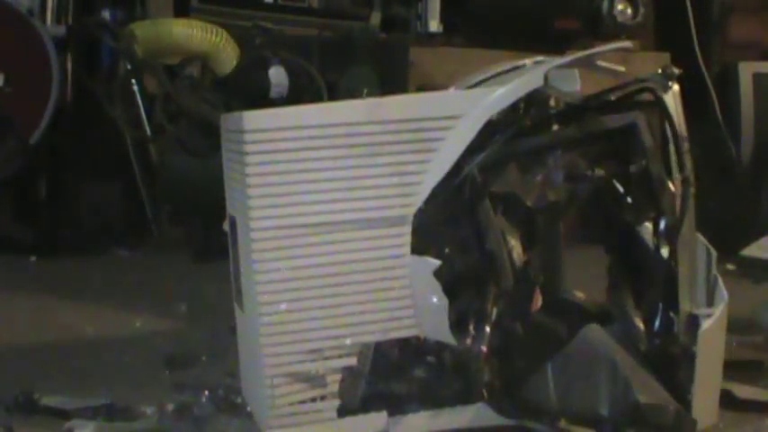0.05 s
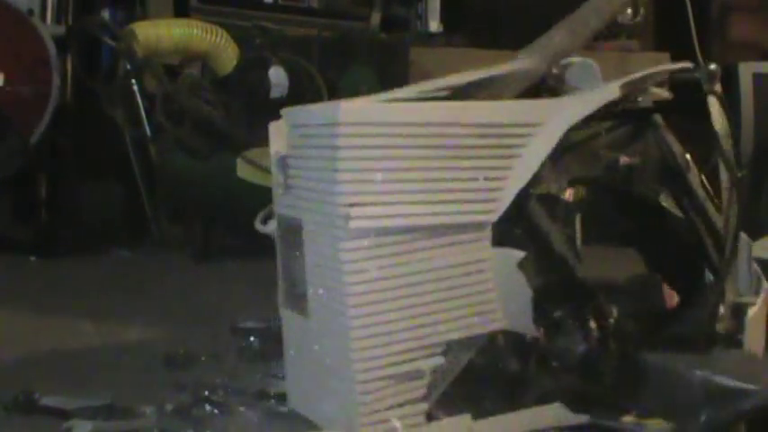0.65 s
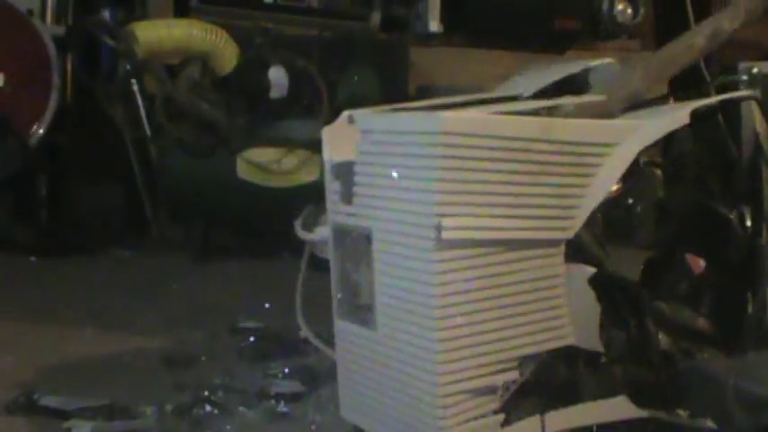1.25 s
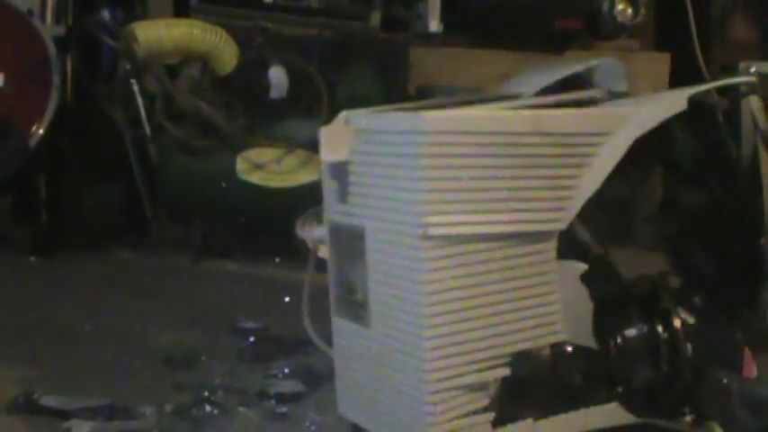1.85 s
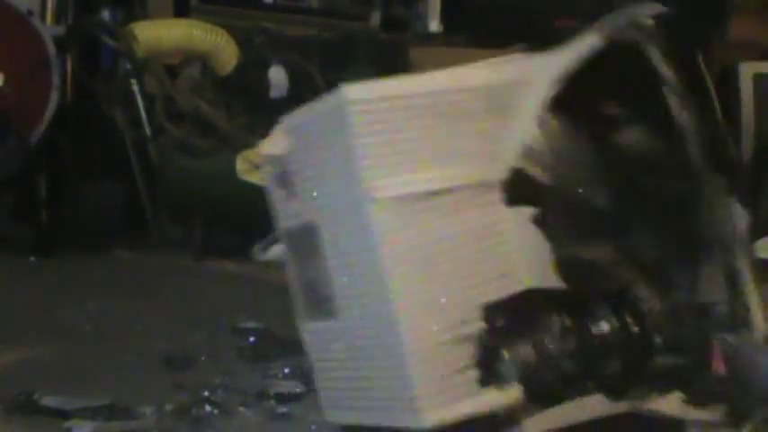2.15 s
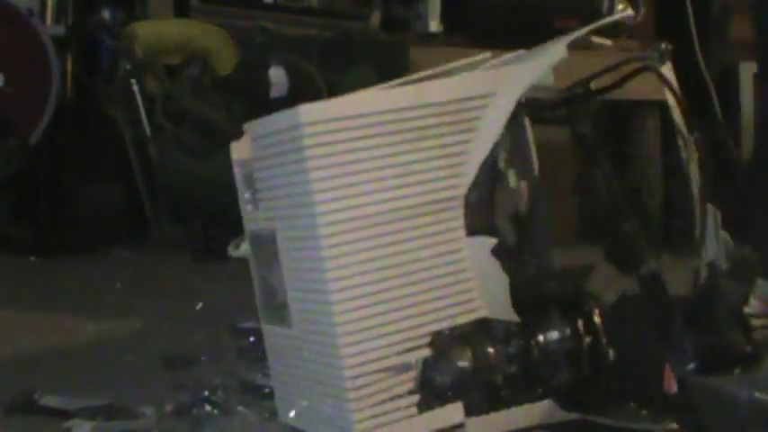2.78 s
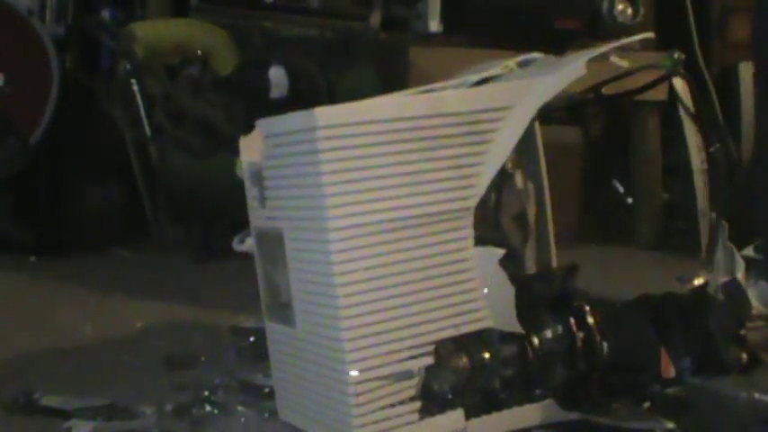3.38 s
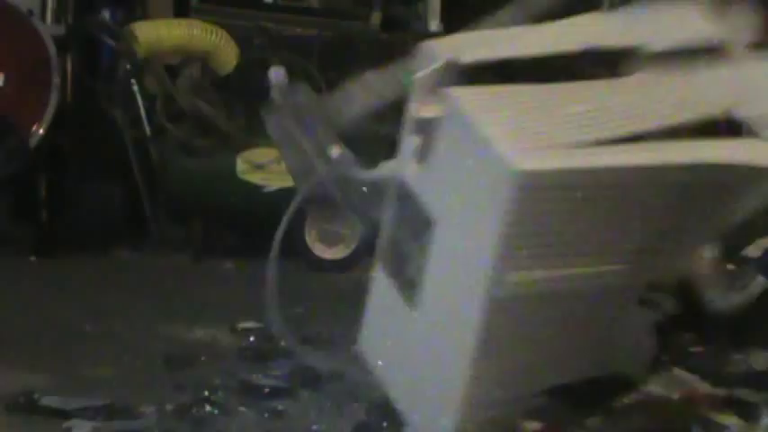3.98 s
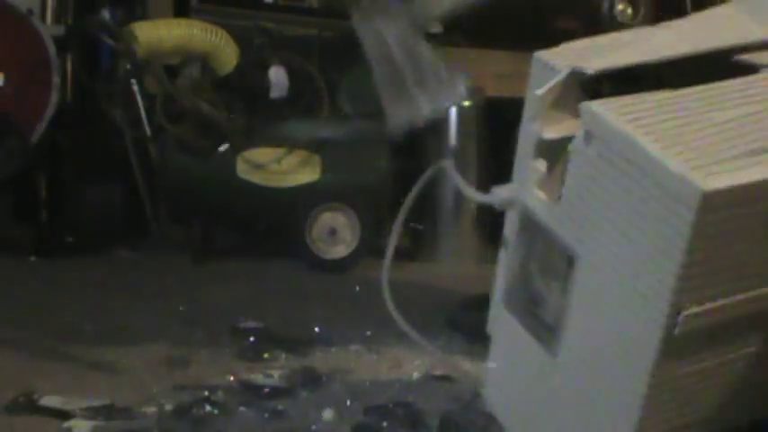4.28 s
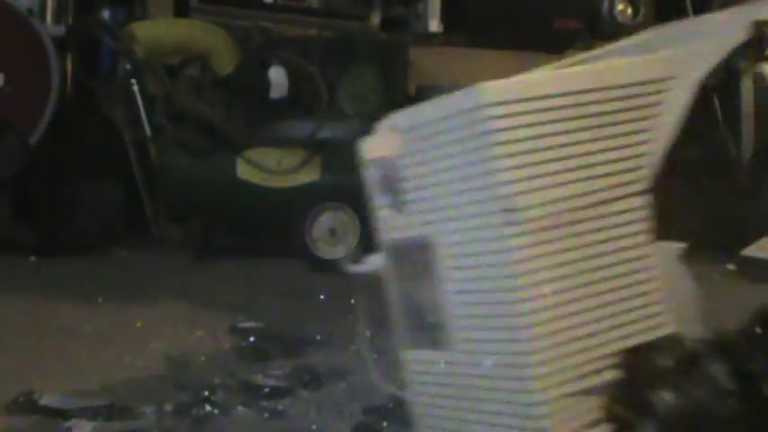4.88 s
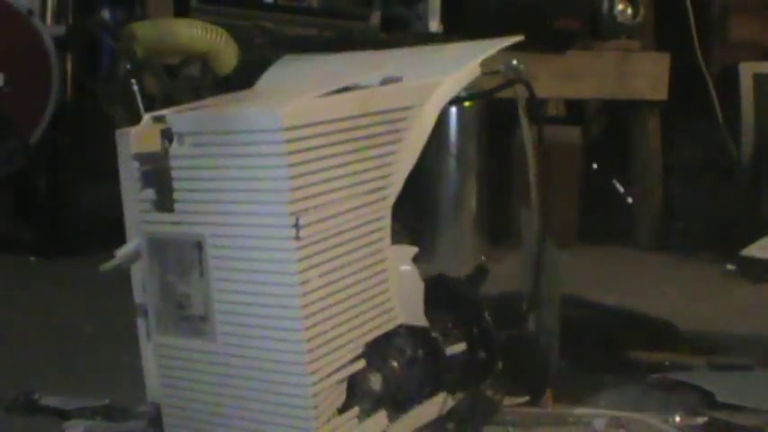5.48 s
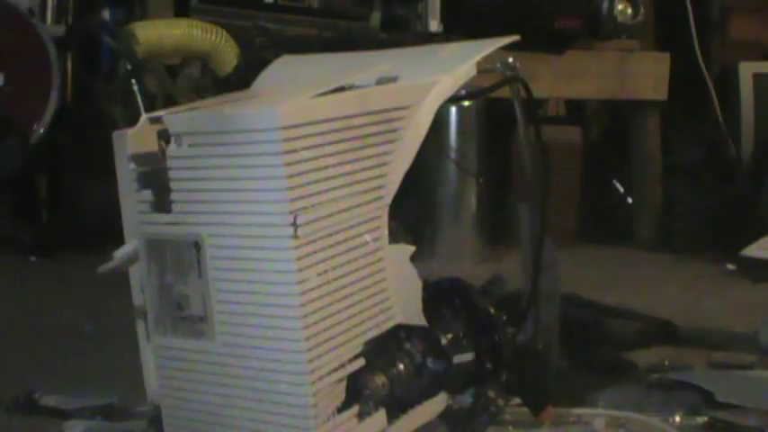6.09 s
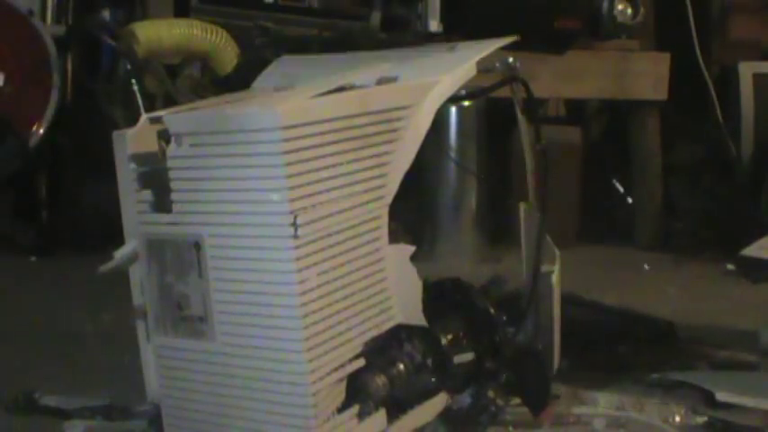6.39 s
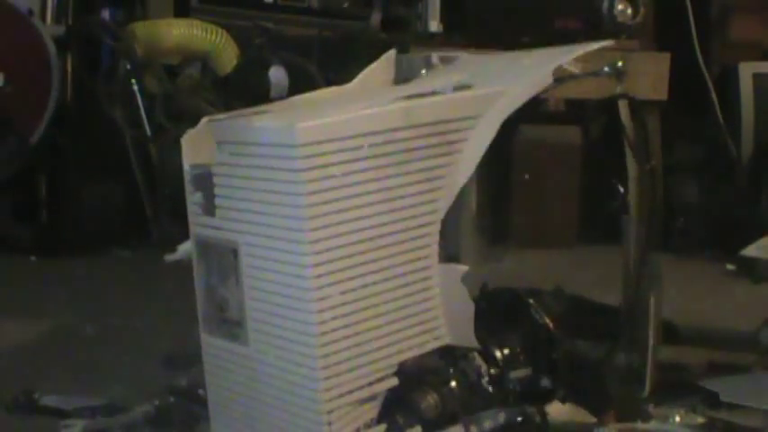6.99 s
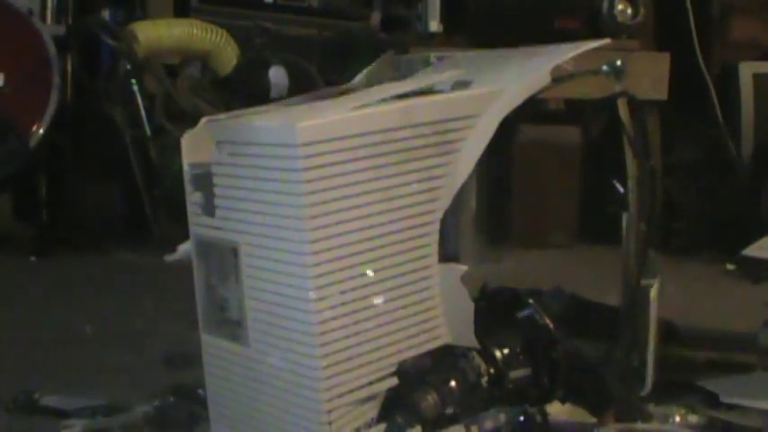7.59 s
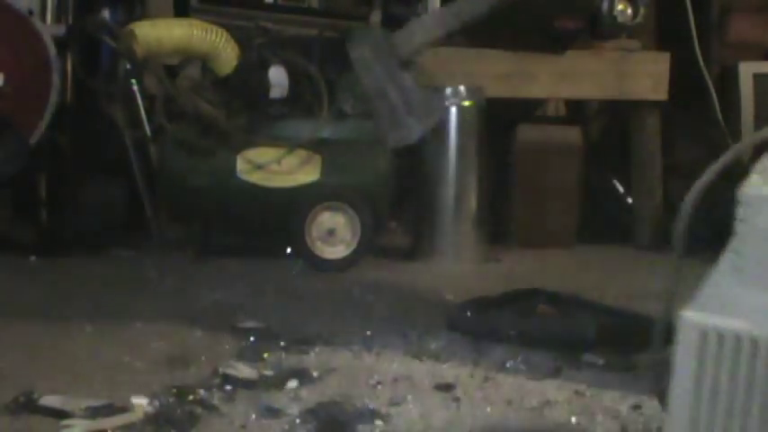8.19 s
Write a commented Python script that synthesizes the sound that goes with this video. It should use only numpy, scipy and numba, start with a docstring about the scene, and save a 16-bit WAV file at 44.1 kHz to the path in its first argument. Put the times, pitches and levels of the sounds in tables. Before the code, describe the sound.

A computer monitor is smashed in an echoing garage. A heavy blow lands right away, and broken glass pours out while the hollow plastic case rattles, knocks and squeaks across the concrete floor. A second crash comes midway, followed by more dragging and clatter, then two more blows near the end. Single shards clink and ring close to the microphone over a faint steady background noise.

```python
"""Smashing a monitor in a garage

Four heavy blows fracture a monitor's glass tube and plastic case on a concrete floor, each a dense
burst of tiny impacts. Between them the case is dragged and rocked over its debris: it rattles, knocks
and squeals, broken glass pours out, and single shards ring in their own modes as they land.
The garage reverberates over a faint steady noise."""
import sys
import numpy as np
from scipy import signal
from scipy.fft import rfft, irfft, next_fast_len
from scipy.io import wavfile
from scipy.ndimage import uniform_filter1d
from numba import njit

SR = 44100
rng = np.random.default_rng(int(sys.argv[2]) if len(sys.argv) > 2 else 0)


def to_wav(sig):
    """Store sig (one row per channel, or 1-D mono) as 16-bit WAV at the path in sys.argv[1].

    Samples outside -1..1 are clipped; the rate is SR.
    """
    pcm = np.clip(np.atleast_2d(sig), -1, 1) * 32767
    pcm = np.round(pcm).astype(np.int16)
    wavfile.write(sys.argv[1], SR, pcm.T)  # frames by channels


N = 363643
TIME = np.arange(N) / SR
BAND_LIMIT_HZ = 15900


def amp(db):
    """Amplitude ratio of a level in decibels."""
    return 10 ** (np.asarray(db) / 20)


def unit(x):
    """Normalisation to rms 1."""
    return x / np.sqrt(np.mean(x ** 2) + 1e-20)


def curve_at(points, hz):
    """Interpolation on a log-frequency axis."""
    points_hz, values = np.transpose(points)
    return np.interp(np.log(hz + 1), np.log(points_hz + 1), values)


def add(mix, start_s, sound):
    """Superposition: a sound joins the mix at start_s."""
    part = mix[max(round(start_s * SR), 0):][:len(sound)]
    part += sound[:len(part)]


def colour(pair, spectrum, size=4096):
    """Minimum-phase filtering imposes a spectrum on two channels, returned at rms 1."""
    hz = abs(np.fft.fftfreq(size, 1 / SR))
    log_gain = np.log(amp(curve_at(spectrum, hz)))
    taps = np.fft.ifft(np.exp(np.conj(signal.hilbert(log_gain)))).real
    return unit(np.array([signal.oaconvolve(side, taps)[:len(side)] for side in pair]))


# Spectrum of the garage's background: frequency_hz, level_db
BACKGROUND_SPECTRUM = [(30, -7.5), (700, -4.5), (3000, -29), (10000, -16), (15000, -49)]

def background(level_db=-60):
    """Stationary coloured noise, uncorrelated between left and right."""
    return amp(level_db) * colour(rng.standard_normal((2, N)), BACKGROUND_SPECTRUM)


# Reverberation time of the garage: frequency_hz, t60_s
GARAGE_DECAY = [(250, 0.76), (5000, 1), (14000, 0.84)]

def room_response(early_db=-10, tail_db=-9.0, early_t60_s=0.14, slot=20):
    """Impulse response: early reflections from floor and clutter, and a tail decaying band by band."""
    taps = np.zeros((2, SR))
    at = np.arange(10 * slot, SR - slot, slot)
    at = at + rng.integers(0, slot, (2, len(at)))  # one reflection in each slot of samples
    np.put_along_axis(taps, at, rng.choice([-1., 1.], at.shape), 1)
    hz, t, bands = signal.stft(taps, SR, nperseg=256)
    decay = amp(-60 * t / curve_at(GARAGE_DECAY, hz)[:, None])
    tail = signal.istft(bands * decay, SR, nperseg=256)[1][:, :SR]
    early = taps * rng.choice([-1, 1], taps.shape) * amp(-60 * np.arange(SR) / SR / early_t60_s)
    return amp(tail_db) * tail / np.linalg.norm(tail[0]) + amp(early_db) * early / np.linalg.norm(early[0])


def reverberation(x, shift_s=.13, patterns=4):
    """Echo paths change as the pieces move: equal-power crossfades cycle through room responses."""
    out = np.zeros((2, N))
    for k in range(patterns):
        weight = np.sqrt(np.maximum(1 - abs((TIME / shift_s - k) % patterns - 1), 0))
        out += signal.fftconvolve((x * weight)[None], room_response(), axes=1)[:, :N]
    return out


@njit
def ring_modes(starts, gains, radians_per_sample, life_samples):
    """Modal synthesis: a sum of damped sinusoids, each with a complex gain per channel."""
    out = np.zeros((2, N))
    for k in range(len(starts)):
        phasor, step = 1 + 0j, np.exp(1j * radians_per_sample[k] - 1 / life_samples[k])
        for i in range(starts[k], min(N, starts[k] + int(6 * life_samples[k]))):
            out[0, i] += (gains[k, 0] * phasor).imag
            out[1, i] += (gains[k, 1] * phasor).imag
            phasor *= step
    return out


def collisions(per_s, spread_db, band_hz, ring_s, tick_db, clump_db=1.8, width=0.45, modes=2):
    """A Poisson process of contacts, many weak and a few strong; each ticks and rings its own modes."""
    at = np.flatnonzero(rng.random(N) < per_s / SR)
    clumps = unit(uniform_filter1d(rng.standard_normal(N), size=900))
    force_db = spread_db * np.minimum(rng.exponential(1, N), 3.5) + clump_db * clumps
    force = amp(force_db) * rng.choice([-1, 1], N) / np.sqrt(per_s)  # power is independent of rate
    pitch_draw, life_draw = rng.random((2, N, modes))[:, at].reshape(2, -1)
    mode_hz = band_hz[0] + pitch_draw * (band_hz[1] - band_hz[0])
    life_samples = ring_s * SR * 10 ** (life_draw - .5)
    starts = np.repeat(at, modes)
    # each mode radiates in its own pattern, so left and right differ
    lean = width * np.exp(2j * np.pi * rng.random((N, modes))[at].ravel())
    gains = force[starts, None] * np.transpose([1 + lean, 1 - lean])
    rings = ring_modes(starts, gains, 2 * np.pi * mode_hz / SR, life_samples)
    energy = np.zeros(N)
    energy[at] = force[at] ** 2
    tick_power = signal.lfilter([1], [1, -np.exp(-1 / (0.00041 * SR))], energy + 1e-12)
    ticks = np.sqrt(tick_power) * rng.standard_normal(N)
    return unit(rings) + amp(tick_db) * unit(ticks)


def motion_db(events, rise_s, late_db=-60, late_db_per_s=60, rest_db=-75):
    """Incoherent movements add in power: each rises, holds, then follows the higher of two decays."""
    power = np.full(N, amp(rest_db) ** 2)
    for start_s, hold_s, level_db, settle_db_per_s in events:
        age_s = np.maximum(TIME - start_s, 0)
        stopped_s = np.maximum(age_s - hold_s, 0)
        release_db = np.maximum(-settle_db_per_s * stopped_s, late_db - late_db_per_s * stopped_s)
        power += ((1 - np.exp(-age_s / rise_s)) * amp(level_db + release_db)) ** 2
    return 10 * np.log10(power)


# An edge of the case catches on concrete: start_s, length_s, level_db, pitch_hz
EDGE_SCRAPES = [(1.63, .035, -17, 880), (1.827, 0.063, -20.5, 1017), (2.167, .22, -28.5, 963),
                (2.504, 0.13, -23.5, 1010), (2.78, .15, -26.5, 940), (4.409, 0.16, -27, 1436),
                (4.858, 0.052, -23.5, 1044), (5.26, 0.072, -24, 820), (7.987, .2, -27.5, 1390),
                (8.07, 0.19, -34, 2900)]

def scrapes(bandwidth_hz=55, waver=0.014):
    """Friction: uneven slips drive a narrow panel resonance whose pitch wavers as the plastic flexes."""
    t, out = np.arange(SR // 3) / SR, np.zeros(N)
    radius = np.exp(-np.pi * bandwidth_hz / SR)
    for start_s, length_s, level_db, pitch_hz in EDGE_SCRAPES:
        slips = rng.standard_normal(len(t)) * (t < length_s)
        flex = unit(uniform_filter1d(rng.standard_normal(len(t)), size=3000))
        carrier = np.exp(2j * np.pi * np.cumsum(pitch_hz * (1 + waver * flex)) / SR)
        ring = (carrier * signal.lfilter([1], [1, -2 * radius, radius ** 2], slips / carrier)).real
        add(out, start_s, amp(level_db) * ring * np.sqrt(length_s * SR / np.sum(ring ** 2)))
    return out


# The case bumps on the floor: start_s, level_db, pitch_hz
FLOOR_BUMPS = [(0.661, -23.5, 178), (1.018, -26, 153), (1.348, -28, 385), (1.784, -28, 146),
               (1.91, -13.5, 430), (2.127, -10.5, 420), (2.16, -13, 311), (3.102, -5, 755),
               (3.46, -13, 1060), (4.456, -17, 484), (6.484, -15, 221), (7.413, -27, 980),
               (8.145, -23, 166)]

def bumps(decay_cycles=1.83, mode_ratio=1.475):
    """Damped vibration: a struck panel rings two modes for a set number of cycles, so low ones last."""
    t, out = np.arange(SR // 5) / SR, np.zeros(N)
    for start_s, level_db, pitch_hz in FLOOR_BUMPS:
        cycles = pitch_hz * t
        modes = np.sin(2 * np.pi * cycles) - np.sin(2 * np.pi * mode_ratio * cycles)
        envelope = (1 - np.exp(-2 * cycles)) * np.exp(-cycles / decay_cycles)
        add(out, start_s, amp(level_db) * modes * envelope)
    return out


# Plastic snaps and glass chips: start_s, level_db, centre_hz
BRITTLE_SNAPS = [(0.019, -13.5, 7000), (0.085, -20.5, 2920), (0.144, -21.5, 1840), (0.245, -15, 6500),
                 (0.421, -23, 1990), (0.781, -7, 8000), (1.209, -13.5, 4800), (2.947, -9, 9800),
                 (5.647, -22, 11500), (5.818, -20.5, 2300), (6.414, -29, 6640), (6.867, -13, 7850),
                 (7.022, -13.5, 2700), (7.404, -32.5, 5900)]

def snaps(gain_db=1, crack_s=0.0029, relative_bandwidth=.35):
    """Brittle fracture: a very short burst of force excites one broad resonance."""
    t, out = np.arange(SR // 20) / SR, np.zeros(N)
    for start_s, level_db, centre_hz in BRITTLE_SNAPS:
        force = rng.standard_normal(len(t)) * np.exp(-t / crack_s)
        radius = np.exp(-np.pi * relative_bandwidth * centre_hz / SR)
        resonator = [1, -2 * radius * np.cos(2 * np.pi * centre_hz / SR), radius ** 2]
        crack = signal.lfilter([1, 0, -1], resonator, force)
        add(out, start_s, amp(level_db + gain_db) * crack / abs(crack).max())
    return out


# Single shards land: start_s, level_db, pitch_hz, t60_s
SHARD_LANDINGS = [(.102, -23.5, 9500, 0.03), (.233, -27, 13000, .025), (.385, -28, 8000, 0.027),
                  (0.953, -18.5, 2870, 0.081), (.986, -12.5, 8500, .03), (1.245, -25, 6400, 0.055),
                  (1.822, -14, 6675, 0.089), (1.928, -19, 11800, 0.046), (2.366, -13.5, 9400, 0.082),
                  (2.646, -15.5, 6700, 0.27), (2.649, -17, 7330, 0.35), (2.775, -30, 12791, 0.42),
                  (2.994, -22, 9470, 0.07), (3.468, -23, 12840, 0.76), (4.175, -18.5, 3618, 0.15),
                  (4.218, -11.5, 6560, 0.094), (4.582, -18.5, 4905, 0.61), (4.631, -17, 9270, 0.098),
                  (4.711, -24, 8650, 0.052), (4.782, -17.5, 6380, 0.36), (5.33, -20, 3510, 0.11),
                  (5.533, -24, 11290, 0.33), (6.761, -20, 4440, 0.17), (6.902, -17.5, 6070, 0.069),
                  (6.735, -23, 3520, .15), (6.904, -25, 2946, 0.27), (7.105, -16, 7600, 0.13),
                  (7.279, -37, 4040, 0.3), (8.152, -19, 7900, 0.18)]

def shards(gain_db=-1, tick_db=-6, clink_db=-8, clink_s=0.0095, twin_gain=0.3, rebound=0.37, touches=4):
    """Inelastic bouncing: each weaker touch ticks, clinks and excites a beating pair of modes."""
    t, out = np.arange(SR // 2) / SR, np.zeros(N)
    for start_s, level_db, pitch_hz, t60_s in SHARD_LANDINGS:
        twin_hz = pitch_hz + rng.uniform(22.4, 98)  # an uneven outline splits the mode in two
        pair = np.sin(2 * np.pi * pitch_hz * t) + twin_gain * np.sin(2 * np.pi * twin_hz * t)
        clink_hz = rng.uniform(pitch_hz / 2, min(2 * pitch_hz, BAND_LIMIT_HZ), (4, 1))
        clink = np.sin(2 * np.pi * clink_hz * t).sum(0) * np.exp(-t / clink_s)
        ring = pair * amp(-60 * t / t60_s) + amp(clink_db) * clink
        gaps_s = t60_s * rng.uniform(.08, .25, touches)
        for k, delay_s in enumerate(np.cumsum(gaps_s) - gaps_s[0]):
            tick = amp(tick_db) * np.gradient(rng.standard_normal(len(t))) * np.exp(-t / .001)
            add(out, start_s + delay_s, amp(level_db + gain_db) * rebound ** k * (ring + tick))
    return out


# Spectrum of broken glass: frequency_hz, level_db
GLASS_SPECTRUM = [(200, -23), (900, 6.5), (2000, -1), (3000, 1), (4800, -1), (6800, 2), (10500, -1),
                  (13000, -5), (15500, -11.5)]
# Glass pours from the tube, then trickles away: start_s, hold_s, level_db, settle_db_per_s
GLASS_SPILLS = [(0, 0.052, -32.5, 218), (.441, 0.61, -20.5, 38.5), (1.38, 0.085, -31, 76),
                (1.5, 0.4, -19, 155), (2.025, .82, -19.5, 124), (3.024, 0.11, -21.5, 42),
                (3.27, 0.021, -23, 90), (3.423, 0.055, -22.5, 62.5), (3.901, 1.396, -20, 94),
                (6.02, 0.13, -54.5, 44), (6.48, 0.2, -20, 54), (7.06, 0.027, -32, 52),
                (7.69, 0.6, -20.5, 66)]

def glass_spill(grit_db=-1.0, tinkle_db=-7.5):
    """Granular flow: grit collides less often as it settles, and larger splinters tinkle."""
    level_db = motion_db(GLASS_SPILLS, rise_s=0.0017)
    activity = np.sqrt(amp(level_db - level_db.max()))
    grit = collisions(per_s=900 + 5000 * activity, spread_db=3.0, band_hz=(2198, 15360),
                      ring_s=0.0021, tick_db=-1.5)
    tinkle = collisions(per_s=70, spread_db=3.2, band_hz=(5600, 12200), ring_s=.005, tick_db=-10)
    return amp(level_db) * (amp(grit_db) * colour(grit, GLASS_SPECTRUM) + amp(tinkle_db) * unit(tinkle))


# Spectrum of the plastic case: frequency_hz, level_db
CASE_SPECTRUM = [(40, -39), (105, -25), (160, -14.5), (340, -8.5), (520, -0.5), (950, 0.5), (1450, 1),
                 (2000, -3.5), (2900, -3.5), (9000, -44.5)]
# The case is shoved, then rocks to rest: start_s, hold_s, level_db, settle_db_per_s
CASE_SHOVES = [(0, 0.35, -46.5, 61), (.441, 0.39, -21, 52), (.9, 0.17, -22, 70), (1.165, 0.036, -24.5, 146),
               (1.41, 0.027, -29.5, 75), (1.5, 0.39, -20.5, 159), (2.07, 0.32, -20.5, 78),
               (2.51, 0.12, -22.5, 110), (2.73, 0.096, -21, 72), (3.43, 0.037, -30, 122),
               (3.901, 0.24, -20, 116), (4.25, 0.557, -24, 103), (4.83, 0.45, -20.5, 98),
               (6.0, 0.13, -54, 4), (6.48, 0.22, -19.5, 151), (7.0, 0.03, -35.5, 65), (7.7, 1, -22, 60)]

def case_rattle(hollow_db=-8):
    """Repeated impacts excite the hollow case; they thin out as it settles, large pieces first."""
    # the heavy case starts more slowly than glass, and loose parts shift on after it stops
    level_db = motion_db(CASE_SHOVES, rise_s=0.01, late_db=-11.5, late_db_per_s=31.5)
    activity = np.sqrt(amp(level_db - level_db.max()))
    rattle = collisions(per_s=4200 * activity, spread_db=2.5, band_hz=(43.7, 4032),
                        ring_s=0.0042, tick_db=0.5)
    hollow = collisions(per_s=160, spread_db=4.0, band_hz=(780.5, 1284), ring_s=0.018, tick_db=-30)
    return amp(level_db) * (colour(rattle, CASE_SPECTRUM) + amp(hollow_db) * activity * hollow)


# Blows and collapses of debris: start_s, level_db, decay_s, case_share (the rest is glass)
BLOWS = [(0.44, -6.5, 0.065, 0.21), (1.498, -18, 0.06, 0.76), (3.021, -20.5, 0.063, 0.06),
         (3.121, -17.5, 0.072, 0.01), (3.424, -14.5, 0.055, 0.02), (3.899, -3, 0.035, 0.37),
         (5.799, -33.5, 0.033, 0.6), (6.479, -5.5, 0.044, 0.33), (7.682, -5.5, 0.06, 0.32),
         (7.72, -5.5, 0.0084, 0.9)]

def smashes(rise_s=.0015, boom_db=-15, boom_hz=(125, 420)):
    """Impulsive excitation: a dense burst of fractures decays exponentially with the shell's boom."""
    plastic = collisions(per_s=5000, spread_db=5.5, band_hz=(39, 3998), ring_s=0.0017, tick_db=3.0)
    boom = signal.lfilter(*signal.butter(3, boom_hz, "band", fs=SR), rng.standard_normal(N))
    case = colour(plastic, CASE_SPECTRUM) + amp(boom_db) * unit(boom)
    splinters = collisions(per_s=9000, spread_db=1.8, band_hz=(2200, 15500), ring_s=.0025, tick_db=0)
    glass = colour(splinters, GLASS_SPECTRUM)
    out = np.zeros((2, N))
    for start_s, level_db, decay_s, case_share in BLOWS:
        age_s = np.maximum(TIME - start_s, 0)
        envelope = (1 - np.exp(-age_s / rise_s)) * np.exp(-age_s / decay_s)
        out += amp(level_db) * envelope * (np.sqrt(case_share) * case + np.sqrt(1 - case_share) * glass)
    return out


def scene(direct_db=-0.51, crossfeed=0.35):
    """Direct sound plus diffuse field; the shards land close by and so sound drier."""
    wreck = smashes() + case_rattle() + glass_spill() + bumps() + scrapes() + snaps()
    near = shards()
    diffuse = reverberation(wreck.mean(0) + near / 2) + background()
    return amp(direct_db) * (wreck + near) + diffuse + crossfeed * diffuse[::-1]


# Level balance of the two channels: frequency_hz, left_minus_right_db
STEREO_BALANCE = [(40, -2), (250, 8), (1100, 2), (4000, 0.5)]
# The bass reaches the two sides out of step: frequency_hz, left_lead_rad
STEREO_PHASE = [(60, 1), (260, -0.014), (900, -0.048)]

def record(dry, ceiling=0.72):
    """Interchannel level and phase shifts, mostly in the bass, then soft saturation and a low-pass."""
    size = next_fast_len(N + SR)
    hz = np.fft.rfftfreq(size, 1 / SR)
    left_gain = amp(curve_at(STEREO_BALANCE, hz) / 2) * np.exp(.5j * curve_at(STEREO_PHASE, hz))
    sides = irfft(rfft(dry, size) * np.array([left_gain, 1 / left_gain]), size)[:, :N]
    rounded = ceiling * np.tanh(sides / ceiling)
    lowpass = signal.firwin(511, BAND_LIMIT_HZ, window=("kaiser", 9), fs=SR)
    return signal.oaconvolve(rounded, lowpass[None], "same")


dry = scene()
out = record(dry)
to_wav(out)
```